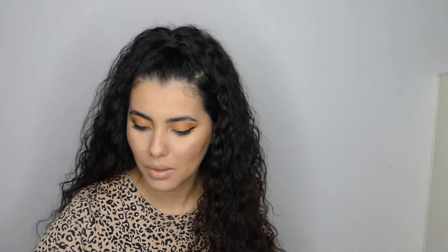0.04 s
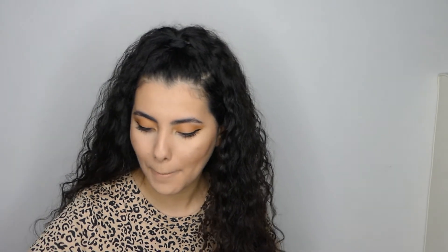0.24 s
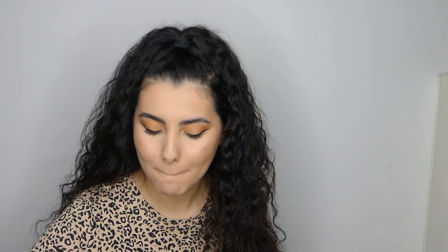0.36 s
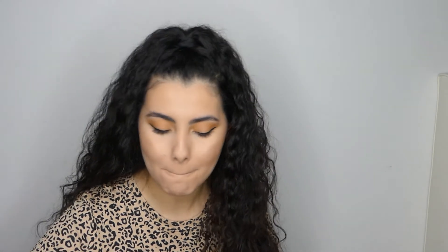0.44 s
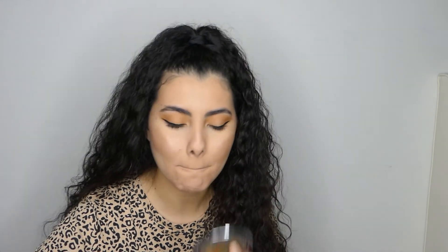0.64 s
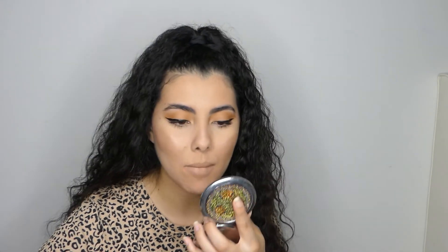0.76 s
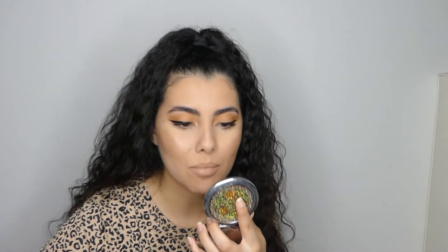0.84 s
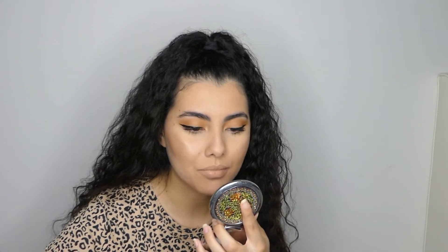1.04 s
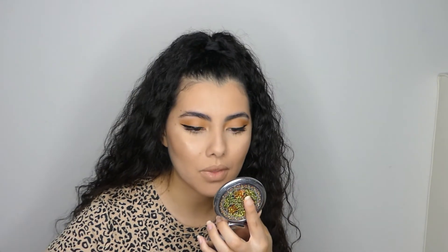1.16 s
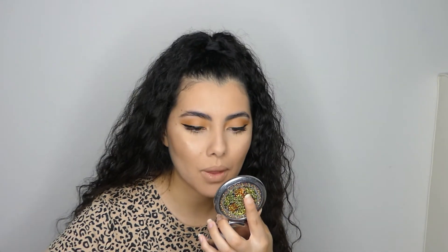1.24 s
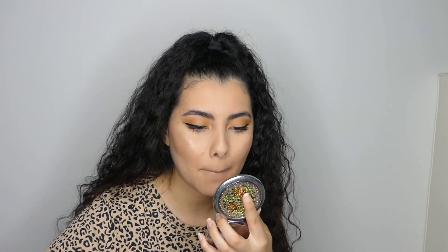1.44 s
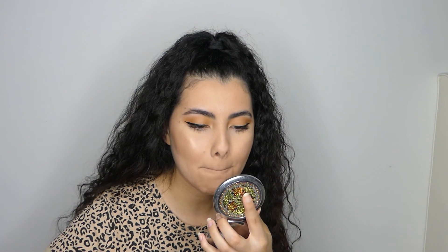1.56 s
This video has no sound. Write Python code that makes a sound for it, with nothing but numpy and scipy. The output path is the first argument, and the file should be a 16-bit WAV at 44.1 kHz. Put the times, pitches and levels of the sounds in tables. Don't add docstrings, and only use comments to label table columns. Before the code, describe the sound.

A hard plastic compact clatters on a table from about 0.2 to 0.47 seconds, loudest near 0.26, with woody knocks, bright rattles and a last knock-heavy slide. A faint shift follows, then a softer tap with a brush of skin at 0.7. A crisp lid click comes at 0.82, a softer one at 0.95. Tiny finger creaks continue until 1.57, over soft room hum and hiss with short reflections.

```python
import sys
import numpy as np
from scipy import signal
from scipy.fft import rfft, irfft
from scipy.io import wavfile
from scipy.ndimage import uniform_filter1d

SR = 44100
rng = np.random.default_rng(int(sys.argv[2]) if len(sys.argv) > 2 else 0)


def invert_db(x):
    u = np.asarray(x, float) / 20
    return 10 ** u


def dump_mix(stems):
    frames = np.atleast_2d(stems).T
    limited = np.clip(frames, -1, 1)
    pcm = np.round(limited * 32767).astype(np.int16)
    wavfile.write(sys.argv[1], SR, pcm)


N = 70560


def curve(table, at, log=False):
    points = np.array(table, float)
    if log:
        return np.interp(np.log(at + 1), np.log(points[:, 0] + 1), points[:, 1])
    return np.interp(at, points[:, 0], points[:, 1], -200, -200)


def colour(x, *tables):
    hz = np.arange(len(x) // 2 + 1) * SR / len(x)
    gain_db = sum(curve(table, hz, True) for table in tables)
    shaped = irfft(rfft(x) * invert_db(gain_db), len(x))
    table_rms = np.sqrt(np.mean(invert_db(2 * curve(tables[0], hz, True))))
    return shaped / np.std(x) / table_rms


def strike(events, modes, rise_s, scatter_db, detune, crack_db, cycles):
    crack_s, crack_hz = .0012, 4000
    crack_length = 399
    out = np.zeros(N + SR)
    t = np.arange(SR // 4) / SR
    hz, db, t60 = np.array(modes, float).T[:, :, None]
    t60 = np.minimum(t60, cycles / hz)
    swell = 1 - np.exp(-(t / rise_s) ** 2)
    crack_filter = signal.butter(1, crack_hz, fs=SR)
    for s, peak_db, focus_hz, octaves in events:
        level_chance, pitch_chance = rng.standard_normal((2, len(modes), 1))
        distance = np.log2(hz / focus_hz) / max(octaves, .2)
        gain = invert_db(db + scatter_db * level_chance - 6 * distance ** 2)
        tones = np.sin(2 * np.pi * hz * (1 + detune * pitch_chance) * t)
        ring = (gain * tones * invert_db(-60 * t / t60)).sum(0)
        ring *= swell / np.sqrt((gain ** 2).sum())
        burst = np.diff(rng.standard_normal(crack_length + 1)) * np.exp(-t[:crack_length] / crack_s)
        ring[:crack_length] += invert_db(crack_db) * signal.lfilter(*crack_filter, burst)
        i = int(s * SR)
        out[i:i + len(t)] += invert_db(peak_db) * ring
    return out[:N]


# (frequency [Hz], level [dB])
HUM_COLOUR = [(55, -18.5), (135, -6), (300, -2), (570, -11), (1500, -18), (4500, -23.5), (10000, -22),
              (15800, -26)]
# (frequency [Hz], side minus mid [dB])
HUM_WIDTH = [(60, 11.5), (200, 5.5), (700, 8.5), (2400, 3.5), (6000, -4.5), (15000, -5)]
# (frequency [Hz], bandwidth [Hz], level [dB])
DRONES = [(183, 14, -74), (300, 12, -72), (437, 14, -75), (853, 14, -80)]


def hum():
    hum_db = -58
    mid = colour(rng.standard_normal(N), HUM_COLOUR)
    side = colour(rng.standard_normal(N), HUM_COLOUR, HUM_WIDTH)
    hz = np.arange(N // 2 + 1) * SR / N
    noise = rfft(rng.standard_normal(N))
    drones = 0
    for centre_hz, width_hz, db in DRONES:
        resonance = 1 / (1 + ((hz - centre_hz) / width_hz * 2) ** 2)
        drone = irfft(noise * resonance, N)
        drones = drones + invert_db(db) * drone / np.std(drone)
    return invert_db(hum_db) * (mid + side * np.array([[1], [-1]])) + drones


# (time [s], level [dB])
FIDGET_LEVEL = [
    (.05, -76),
    (.19, -59.5),
    (.22, -63),
    (1.1, -62.5),
    (1.17, -57),
    (1.24, -78),
    (1.47, -102),
    (1.52, -61.5),
    (1.6, -65),
]
# (time [s], level [dB])
RATTLE_LEVEL = [
    (.222, -88),
    (.23, -32.5),
    (.27, -25.5),
    (.33, -34.5),
    (.37, -38),
    (.43, -35.5),
    (.47, -81),
    (.55, -62),
    (.62, -77.5),
]
# (frequency [Hz], level [dB])
COLLISION_COLOUR = [(120, -32), (200, -19), (503, -2.5), (591, -13.5), (880, -12.5), (1040, -7.5),
                    (2600, -15), (15000, -35)]


def rattle():
    per_s, spread_db = 810, 2.5
    t = np.arange(N) / SR
    happens = rng.random(N) < per_s / SR
    size = invert_db(spread_db * rng.exponential(size=N))
    collisions = happens * size * rng.choice([-1, 1], N)
    level = invert_db(curve(RATTLE_LEVEL, t)) + invert_db(curve(FIDGET_LEVEL, t))
    return colour(collisions, COLLISION_COLOUR) * level


TABLE_TOUCH = dict(rise_s=.0003, scatter_db=1., detune=.025, crack_db=-28, cycles=26)
# (time [s], peak [dB], loudest region [Hz], its width [octaves])
TABLE_KNOCKS = [(.2065, -41, 450, 0.64), (.2268, -16, 400, 2.8), (.231, -26, 395, 1.9),
                (.2592, -10, 544, 0.67), (.3105, -19.5, 350, 0.31), (.3132, -13.5, 395, 1.3),
                (.329, -33.5, 450, 1.3), (.344, -21.5, 483, 1.4), (.359, -30.5, 392, 1.7),
                (.3765, -22.5, 690, 0.74), (.3815, -22.5, 540, 0.54), (.391, -21, 490, 0.56),
                (.397, -23.5, 510, 0.27), (.406, -32, 580, 0.2), (.4115, -32, 496, 0.66),
                (.422, -25.5, 484, 0.56), (.434, -30.5, 460, 1.1), (.449, -37, 460, 0.47),
                (.461, -56, 480, .7), (.470, -45.5, 450, 0.96), (.6915, -31.5, 453, 2.3),
                (.694, -33, 260, 0.35), (.697, -30, 617, 1.6), (.7005, -34.5, 600, 0.36),
                (.7045, -40.5, 300, 0.95), (.709, -42, 298, 0.42)]
# (frequency [Hz], level [dB], t60 [s])
TABLE_MODES = [(176, -1, 0.083), (270.4, -6, 0.065), (310.6, -12, 0.11), (377, -21.5, 0.073),
               (447, 4.5, 0.048), (511.5, -6, 0.077), (636, -4.5, 0.042), (763.4, -4, 0.05)]


def knocks():
    return strike(TABLE_KNOCKS, TABLE_MODES, **TABLE_TOUCH)


# (time [s], peak [dB], loudest region [Hz], its width [octaves])
LANDINGS = [
    (.2268, -34, 131, 1.6),
    (.259, -32.5, 131, 1.5),
    (.3105, -53, 131, 1.3),
    (.692, -41, 131, 1.5),
]
# (frequency [Hz], level [dB], t60 [s])
TABLE_TOP_MODES = [(94, -24, 0.037), (131, 0, 0.34)]


def thumps():
    return strike(LANDINGS, TABLE_TOP_MODES, **TABLE_TOUCH)


# (time [s], peak [dB], loudest region [Hz], its width [octaves])
CASE_BLOWS = [(.2268, -20, 4000, 2), (.2335, -53, 1800, 1.9), (.2588, -2, 1900, 1.53),
              (.2602, -7, 2400, 0.27), (.2615, -20.5, 880, 0.25), (.2662, -12.5, 4380, 0.17),
              (.270, -13.5, 1100, 0.27), (.2705, -13, 2400, 0.55), (.275, -23, 1900, 1.2),
              (.2795, -29, 2460, 0.71), (.284, -14, 1350, .5), (.288, -23, 1100, 1.1),
              (.292, -17, 2900, 0.22), (.2995, -31, 3000, 1.2), (.337, -18, 2900, 0.32),
              (.3748, -9, 2400, 1.16), (.3775, -21, 840, 0.31), (.380, -23, 1770, 1.05),
              (.386, -19, 1480, 1.5), (.403, -21, 2770, 1.1), (.412, -35, 2970, 0.35),
              (.422, -23, 2500, 0.8), (.435, -24.5, 2180, 0.62), (.449, -27, 2110, 0.19),
              (.455, -54, 2300, 1.5), (.505, -33.5, 3050, 0.13), (.529, -39.5, 1100, 0.31),
              (.691, -28.5, 4500, 6), (.6975, -27, 4940, 1.1), (.7005, -28, 2920, 0.35),
              (.711, -35, 1900, 0.24)]
# (frequency [Hz], level [dB], t60 [s])
CASE_MODES = [(880, 7.5, 0.06), (1163, -2, 0.029), (1330, -5, 0.04), (1568, 3, 0.03), (1960, 0.5, 0.025),
              (2113, 4, 0.011), (2423, 4.5, 0.018), (2834, -2, 0.015), (3337, -1, 0.02), (3550, -9, .02),
              (4100, 0.5, .02), (4490, -1.5, 0.02), (5100, -23, 0.012), (6260, 0.5, 0.012)]


def blows():
    return strike(CASE_BLOWS, CASE_MODES, rise_s=.0002, scatter_db=1., detune=.009, crack_db=-23, cycles=40)


# (time [s], level [dB])
BRUSH_LEVEL = [
    (.54, -64),
    (.62, -61.5),
    (.685, -53),
    (.70, -45),
    (.72, -60),
    (.745, -70),
    (.79, -65),
    (.85, -58.5),
]
# (frequency [Hz], level [dB])
BRUSH_COLOUR = [(300, -11), (1500, 0), (5000, 4.5), (10000, 0), (15000, -7)]


def brush():
    t = np.arange(N) / SR
    return colour(rng.standard_normal(N), BRUSH_COLOUR) * invert_db(curve(BRUSH_LEVEL, t))


# (time [s], peak [dB], loudest region [Hz], its width [octaves])
FINGER_CREAKS = [(.613, -46, 850, 0.29), (.645, -41, 1210, 0.7), (.649, -38, 850, 0.5),
                 (1.001, -43.5, 1280, 0.33), (1.008, -43, 850, 0.27), (1.091, -43, 850, 0.32),
                 (1.116, -55, 3200, 0.19), (1.1155, -41, 1160, 0.35), (1.133, -61, 1270, 0.46),
                 (1.16, -57, 1190, 0.46), (1.2465, -39.5, 1200, 0.75), (1.37, -73, 850, 0.42),
                 (1.513, -54.5, 2500, 0.76), (1.5655, -40.5, 1100, 1.5)]
# (frequency [Hz], level [dB], t60 [s])
SHELL_MODES = [(850, 13.5, 0.022), (1060, -5, 0.02), (1270, 12, 0.022), (1900, 3.5, 0.041),
               (3200, -21, 0.027)]


def creak():
    slip_s, slip_db = .004, -17
    length = 600
    slips = rng.standard_normal(length) * (rng.random(length) < .05)
    trail = slips * np.exp(-np.arange(length) / SR / slip_s) * invert_db(slip_db)
    first = strike(FINGER_CREAKS, SHELL_MODES, rise_s=.0016, scatter_db=.6, detune=.008, crack_db=-36, cycles=80)
    return signal.lfilter(np.append(1, trail), 1, first)


# (time [s], peak [dB], loudest region [Hz], its width [octaves])
LID_CLICKS = [
    (.8183, -18, 1900, 4.7),
    (.9545, -26.5, 1900, 1.4),
]
# (frequency [Hz], level [dB], t60 [s])
LID_MODES = [(1100, -31, 0.011), (1344, -7, 0.04), (1570, 8, 0.0072), (1986, -9.5, 0.034),
             (2400, -19, 0.045), (2940, -11.5, 0.033), (3980, -14, 0.022), (4160, -10.5, 0.02),
             (4860, -12, 0.016), (5390, -14, 0.013)]


def clicks():
    return strike(LID_CLICKS, LID_MODES, rise_s=.0004, scatter_db=.6, detune=.004, crack_db=-15, cycles=130)


# (frequency [Hz], t60 [s])
ROOM_DECAY = [(125, 0.64), (350, 0.29), (1000, 0.25), (2500, 0.24), (6000, 0.34), (12000, 0.18)]
# (frequency [Hz], level [dB])
TAIL_COLOUR = [(100, -17.5), (250, -0.5), (500, 0.5), (4000, 0.5), (12000, 0.5)]
# (frequency [Hz], side minus mid [dB])
TAIL_WIDTH = [(100, -5), (300, -14.5), (1000, -6), (5000, -8.5), (9000, -4.5), (14000, -1)]
# (delay [s], left level [dB], right level [dB])
WALL_ECHOES = [(.0042, -9, -8), (.008, -5, -6), (.0096, -9, -11), (.013, -10, -9)]


def room(x):
    room_db, rise_s, even_hz, pan_db = -1, .006, 50, 4.5
    t = np.arange(SR // 2) / SR
    hz = np.arange(len(t) // 2 + 1) * SR / len(t)
    noise = rfft(rng.standard_normal((2, len(t))))
    tail = 0
    for k, (_, t60) in enumerate(ROOM_DECAY):
        band = [(f, j == k) for j, (f, _) in enumerate(ROOM_DECAY)]
        tail = tail + irfft(noise * curve(band, hz, True), len(t)) * invert_db(-60 * t / t60)
    rise = 1 - np.exp(-(t / rise_s) ** 2)
    tone = rfft(tail * rise)
    smooth = np.sqrt(uniform_filter1d(abs(tone) ** 2, size=even_hz // 2))
    tone = tone * invert_db(curve(TAIL_COLOUR, hz, True)) / smooth
    tail = irfft(tone, len(t)) * rise * (t < t[-1] * .9)
    tail *= invert_db(room_db) / np.sqrt((tail[0] ** 2).sum())
    side = irfft(rfft(tail[1]) * invert_db(curve(TAIL_WIDTH, hz, True)), len(t))
    answer = tail[0] + side * np.array([[1], [-1]])
    answer[:, 0] += invert_db(np.array([pan_db, -pan_db]) / 2)
    for s, left_db, right_db in WALL_ECHOES:
        answer[:, int(s * SR)] += invert_db(np.array([left_db, right_db]))
    return signal.fftconvolve(x[None], answer, axes=1)[:, :N]


def scene():
    low_cut_hz, creak_room_db, room_send_db = 112, -10, -5
    hits = rattle() + knocks() + thumps() + blows() + brush() + clicks()
    hits = signal.sosfilt(signal.butter(5, low_cut_hz, "high", fs=SR, output="sos"), hits)
    creaks = creak()
    return invert_db(room_send_db) * room(hits + invert_db(creak_room_db) * creaks) + creaks + hum()


def top_cut(x):
    return signal.sosfilt(signal.butter(12, 16000, fs=SR, output="sos"), x)


def record(dry):
    ceiling, top_hz = .55, 15450
    rounded = ceiling * np.tanh(dry / ceiling)
    mix = signal.sosfilt(signal.ellip(10, .2, 60, top_hz, fs=SR, output="sos"), rounded)
    return top_cut(mix)


dry = scene()
out = record(dry)
dump_mix(out)
```